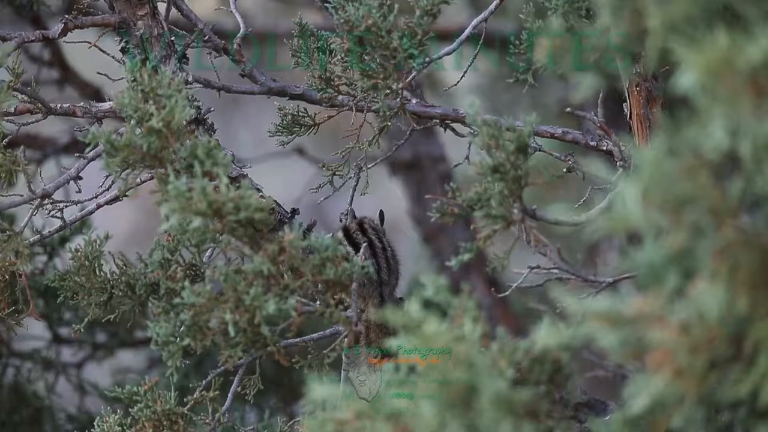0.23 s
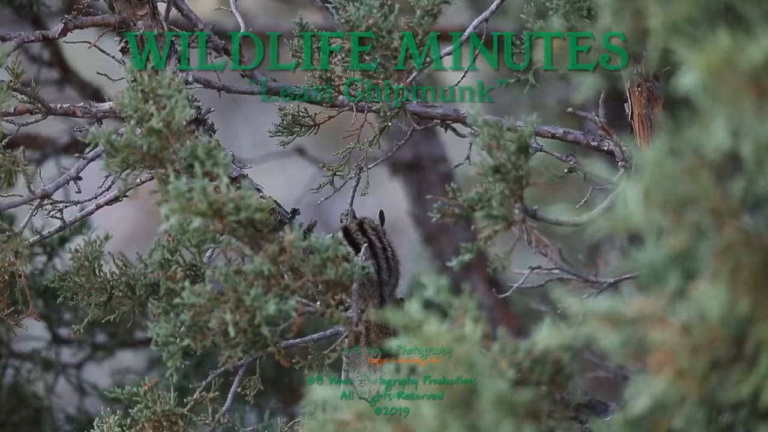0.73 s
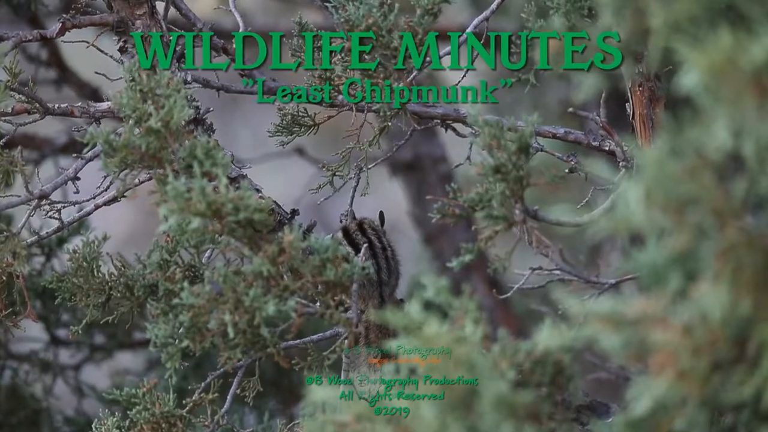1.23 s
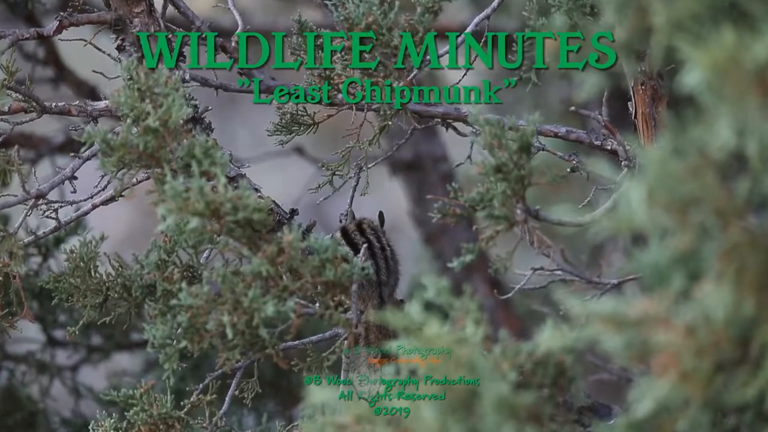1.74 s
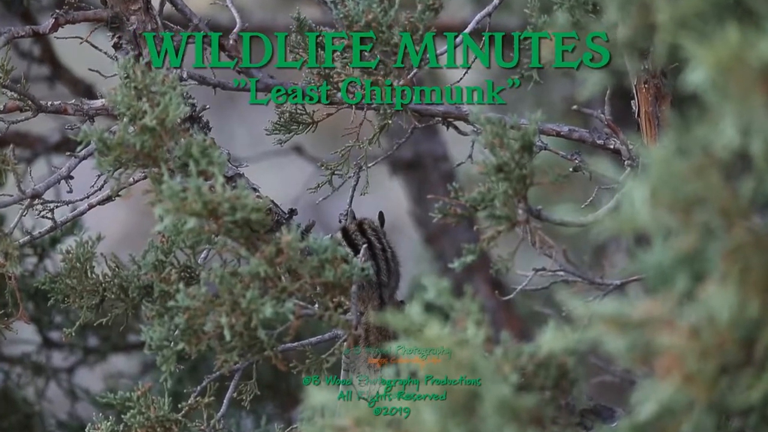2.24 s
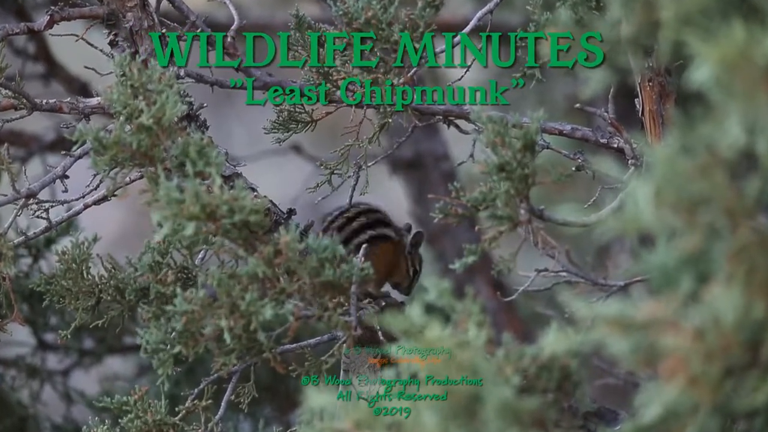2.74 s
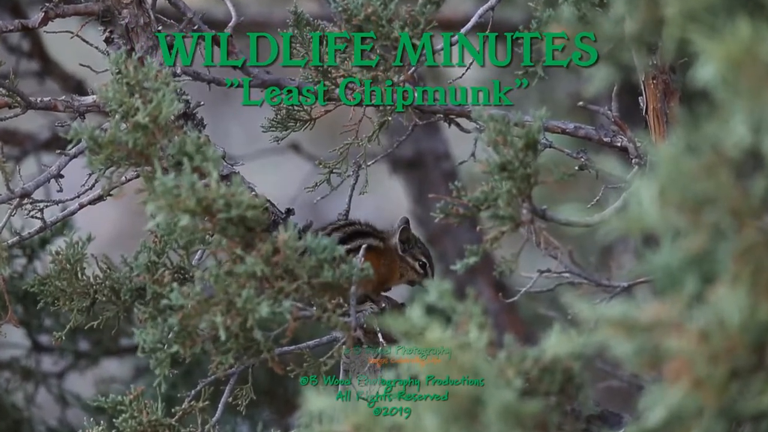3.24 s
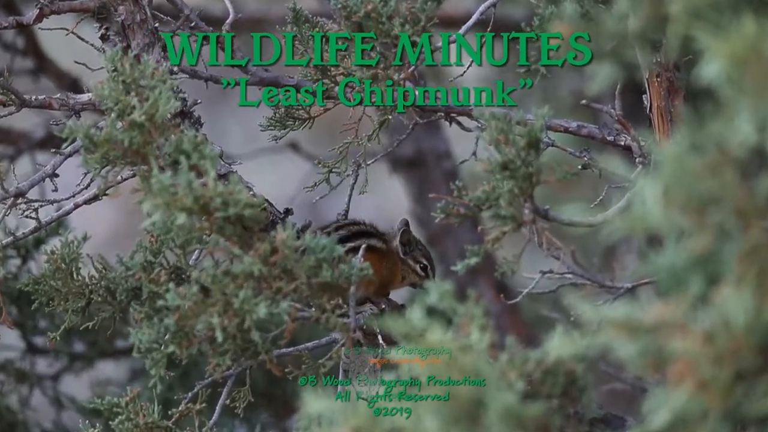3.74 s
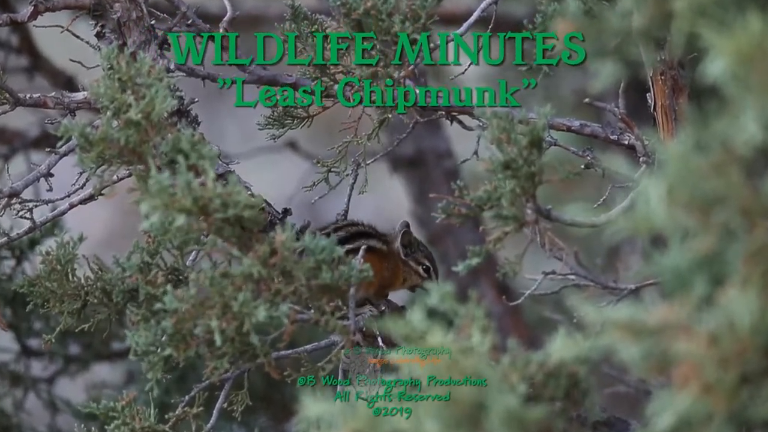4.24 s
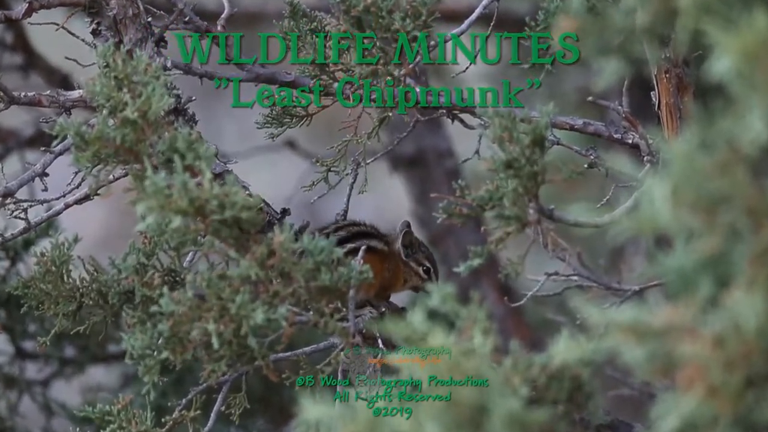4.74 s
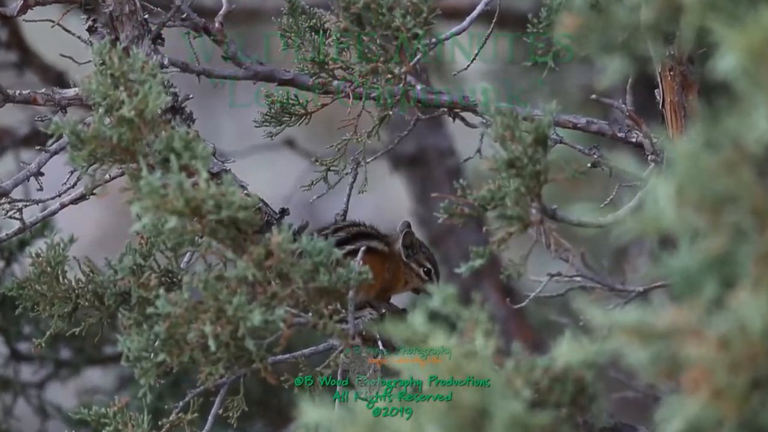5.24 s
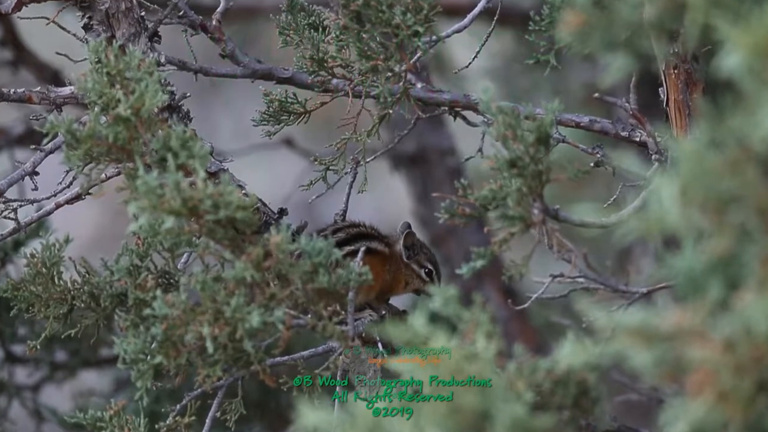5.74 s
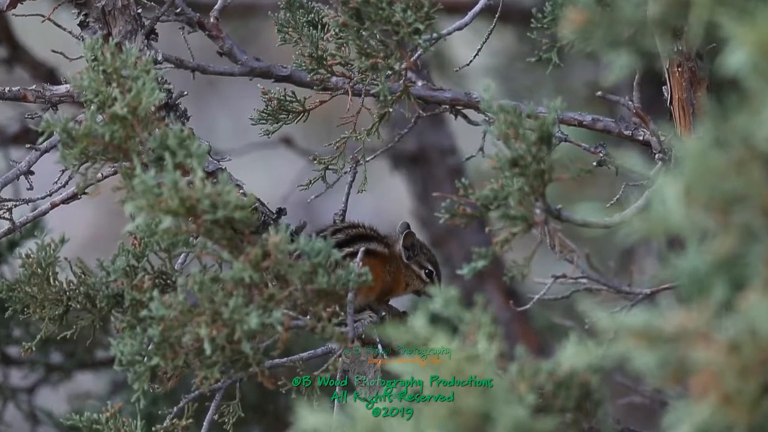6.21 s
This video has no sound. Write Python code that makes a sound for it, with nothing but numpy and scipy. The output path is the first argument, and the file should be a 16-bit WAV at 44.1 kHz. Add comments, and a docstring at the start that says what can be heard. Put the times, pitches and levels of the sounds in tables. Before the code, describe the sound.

Two chipmunks chip rapidly outdoors, their short high calls drifting in and out of step over light wind and a faint distant motor hum.

```python
"""Two chipmunks in a juniper

Each chips about five times a second, and the two drift in and out of step. A chip is a quick run of
upward glides whose pitch leaps into the range where the throat rings; branches and trees scatter it.
Behind them are light wind, a far motor's hum and a few faint bird whistles."""
import sys
import numpy as np
from scipy import signal
from scipy.fft import rfft, irfft, next_fast_len
from scipy.io import wavfile
from scipy.ndimage import map_coordinates

SR = 44100
rng = np.random.default_rng(int(sys.argv[2]) if len(sys.argv) > 2 else 0)


def unload_wav(signal):
    """Save mono or channel-first audio to the path in sys.argv[1] as 16-bit WAV at rate SR, clipped to [-1, 1]."""
    wavfile.write(
        sys.argv[1],
        SR,
        np.round(np.clip(np.atleast_2d(signal).T, -1, 1) * 32767).astype(np.int16),
    )


N = 285327
ATTACK_MS, RELEASE_MS = .5, 1.8  # how quickly each glide of a chip fades in and out


def amp(db):
    """Turn decibels into a number to multiply a sound by."""
    return 10 ** (np.asarray(db) / 20)


def unit(x):
    """Scale a signal to an average strength (rms) of 1."""
    return x / np.sqrt(np.mean(x ** 2) + 1e-20)


def along(points, hz):
    """Read between (Hz, value) points, giving every octave the same width."""
    point_hz, values = np.transpose(points)
    return np.interp(np.log(hz + 1), np.log(point_hz + 1), values)


def wobble(rate, size=N):
    """A smooth curve through `rate` random values a second."""
    position = np.arange(size) * rate / SR
    return map_coordinates(rng.standard_normal(int(position[-1]) + 4), [position])


def swell(s, half_length_s, db):
    """A rise in dB that comes up, holds around time s and sinks again."""
    return db / (1 + ((np.arange(N) / SR - s) / half_length_s) ** 4)


def filtered(x, response):
    """Scale each frequency in x by response(hz)."""
    size = next_fast_len(N + SR // 4)
    hz = np.fft.rfftfreq(size, 1 / SR)
    return irfft(rfft(x, size) * response(hz), size)[..., :N]


def noise(spectrum):
    """Noise of strength 1, shaped by (Hz, dB) points."""
    return unit(filtered(rng.standard_normal(N), lambda hz: amp(along(spectrum, hz))))


def add(track, s, sound):
    """Mix a sound into the track from time s."""
    i = max(round(s * SR), 0)
    track[i:i + len(sound)] += sound[:max(N - i, 0)]


def scatter(fade_s, rise_s):
    """A blur of tiny echoes that builds up, then dies away by 60 dB every fade_s."""
    t = np.arange(SR // 2) / SR
    build_up = 1 - np.exp(-(t / rise_s) ** 2)
    tail = rng.standard_normal(len(t)) * amp(-60 * t / fade_s) * build_up
    return tail / np.linalg.norm(tail)


def woodland(sound, echoes, branches_db, trees_db):
    """A sound arrives directly, as single echoes, and blurred by near branches and farther trees."""
    path = amp(branches_db) * scatter(fade_s=.066, rise_s=.0051)
    path += amp(trees_db) * scatter(fade_s=.42, rise_s=.01)
    path[0] += 1  # the direct sound
    for ms, db in echoes:
        path[round(ms * SR / 1000)] += amp(db)
    return signal.fftconvolve(sound, path)


def wind():
    """Steady air, one soft gust in the needles, and a far rumble and drone that slowly grow."""
    # Four noise shapes. Each row: frequency in Hz, relative level in dB.
    air_shape = [(25, -34), (40, -7), (85, -8.5), (150, -2.5), (200, -1), (400, 0.5), (600, -2),
                 (1100, -3.5), (1500, -7.5), (2000, -12), (4000, -17.5), (7500, -19.5), (11000, -21.5),
                 (15000, -25.5)]
    needle_shape = [(400, -62), (700, -5.5), (1100, 4), (1650, -3.5), (2100, -21.5), (4000, -41)]
    rumble_shape = [(35, -44), (65, -7), (120, 7), (170, -33), (300, -42)]
    drone_shape = [(120, -40), (180, 4), (230, 4), (270, -7), (380, -33)]
    # The gust and two low swells near 3.6 s and 3.9 s. Each gives: middle in seconds, half length in seconds,
    # rise in dB.
    gust = (2.39, .2, 9)
    bumps = [(3.6, .06, 13), (3.92, .1, 9)]
    growth_db = .97 * np.arange(N) / SR
    bumps_db = sum(swell(*bump) for bump in bumps)
    air = amp(-48) * noise(air_shape)
    needles = amp(-59.5 + swell(*gust)) * noise(needle_shape)
    rumble = amp(-70.5 + growth_db + bumps_db) * noise(rumble_shape)
    drone = amp(-65 + growth_db / 2 + 2.5 * wobble(6)) * noise(drone_shape)  # comes and goes
    return air + needles + rumble + drone


def motor(drift=.0018, smear_radians=.61, waver_db=1, treble_db=-1.3):
    """A far motor hums; its higher tones waver more on their way through the air."""
    # The hum's tones. Each row: frequency in Hz, base level in dB.
    tones = [(59.5, -62.5), (119.5, -66.5), (226.1, -65), (297.2, -67), (356.9, -60), (475.9, -66.5)]
    speed = 1 + drift * wobble(1.92)
    out = np.zeros(N)
    for hz, db in tones:
        depth = min((hz / 240) ** 2, 1)
        phase = 2 * np.pi * hz * np.cumsum(speed) / SR + smear_radians * depth * wobble(14)
        level_db = db + depth * (treble_db + waver_db * wobble(5.4))
        out += np.sqrt(2) * amp(level_db) * np.sin(phase)
    return out


def bird(gain_db=3.5, quaver=.014, flutter_db=2.5):
    """A far bird whistles short, slightly unsteady slides through the trees."""
    # Each row: start in seconds, length in seconds, first and last pitch in Hz, base level in dB.
    whistles = [(.11, .068, 5300, 3900, -60), (.228, .045, 4400, 2800, -56), (.28, .032, 3800, 2800, -55),
                (.37, .035, 3950, 2750, -55), (.402, .03, 4100, 3000, -55), (2.475, .035, 3450, 3850, -59),
                (2.82, .028, 4850, 4150, -57), (2.997, .018, 4400, 4130, -54),
                (3.168, .028, 4250, 4080, -55)]
    out = np.zeros(N)
    for s, length_s, start_hz, end_hz, db in whistles:
        n = round(length_s * SR)
        pitch = np.geomspace(start_hz, end_hz, n) * (1 + quaver * wobble(390, n))
        level = amp(db + gain_db + flutter_db * wobble(190, n)) * np.sqrt(np.hanning(n))
        note = level * np.sin(2 * np.pi * np.cumsum(pitch) / SR)
        add(out, s, woodland(note, echoes=[], branches_db=-3, trees_db=-3))
    return out


def tremble(size):
    """A very fast random quiver for the voice."""
    smoothed = signal.fftconvolve(rng.standard_normal(SR // 20), np.hanning(SR // 700), "same")
    return unit(smoothed)[:size]


def glide(row, tuning, roughness, overtone_fall_db, shimmer_db=2.5, overlap_ms=.35):
    """One upward sweep of the voice with its overtones; pitch and strength tremble a little."""
    length_ms, start_hz, end_hz, db, swell_db, overtones_db, growth_db = row
    ms = np.arange(-overlap_ms, length_ms + overlap_ms, 1000 / SR)
    progress = ms / length_ms
    pitch = start_hz * (end_hz / start_hz) ** progress * (tuning + roughness * tremble(len(ms)))
    phase = 2 * np.pi * np.cumsum(pitch) / SR
    voice = np.sin(phase)
    for k in (2, 3, 4):
        overtone_db = overtones_db + growth_db * (progress - .5) - overtone_fall_db * (k - 2) ** 2
        voice += amp(overtone_db) * (k * pitch < SR / 2) * np.sin(k * phase)
    edges = np.minimum((ms - ms[0]) / ATTACK_MS, (ms[-1] - ms) / RELEASE_MS)
    fade = np.sin(np.pi / 2 * np.minimum(edges, 1))
    level_db = db + swell_db * (progress - .5) + shimmer_db * tremble(len(ms))
    return voice * fade * amp(level_db)


def chip(glides, throat, treble_db, pitch_spread, roughness, overtone_fall_db):
    """Four glides, shaped by the throat: faint low start, buzzy lead-in, main note, closing flick."""
    # How much each of the four glides varies from chip to chip, in dB.
    variations_db = [1.4, 0.76, 0.18, 0.3]
    # Where a wider mouth brightens the chip. Each row: frequency in Hz, share of treble_db.
    mouth = [(6500, 0), (8000, 0.98)]
    voice = np.zeros(SR // 20)
    tuning = 1 + pitch_spread * rng.standard_normal()
    s = 0
    for row, variation_db in zip(glides, variations_db):
        strength = amp(variation_db * rng.standard_normal())
        add(voice, s, strength * glide(row, tuning, roughness, overtone_fall_db))
        s += row[0] / 1000
    hz = np.fft.rfftfreq(len(voice), 1 / SR)
    shape_db = along(throat, hz) + treble_db * along(mouth, hz)
    return irfft(rfft(voice) * amp(shape_db), len(voice))


def chipmunk(chips, glides, throat, echoes, gain_db, branches_db, trees_db, **voice):
    """One animal's chips, each timed by its main note and heard through the trees."""
    out = np.zeros(N)
    lead_s = (glides[0][0] + glides[1][0] + ATTACK_MS) / 1000
    for s, db, treble_db in chips:
        call = amp(db + gain_db) * chip(glides, throat, treble_db, **voice)
        add(out, s - lead_s, woodland(call, echoes, branches_db, trees_db))
    return out


def two_chipmunks():
    """One voice is bright; the other is hoarse because its pitch trembles more."""
    # The chips. Each row: time of the main note in seconds, base level in dB, treble boost in dB.
    bright_chips = [(0.2146, -28, -2), (0.4146, -24, -1.5), (0.6102, -25, 1), (0.8183, -25, 0),
                    (1.037, -23.5, 1.5), (1.2549, -25, -1.0), (1.475, -24.5, 2), (1.6771, -24.5, 0.5),
                    (1.8748, -24, 0), (2.1323, -24.5, 2), (2.4485, -25, -4), (2.7105, -24, -3),
                    (2.9477, -25, -5), (3.1294, -24, -2), (3.3215, -24.5, 0), (3.5496, -25.5, 2),
                    (3.7497, -24.5, -2.5), (3.941, -25.5, 2.5), (4.1361, -26, 1.5), (4.3237, -26.5, 0.5),
                    (4.5196, -24, 0), (4.7067, -24.5, 0.0), (4.8893, -25.5, 0), (5.0799, -24, 1.5),
                    (5.2743, -23.5, 1.5), (5.436, -23.5, 1), (5.6342, -23.5, 2), (5.9483, -24, 1.5),
                    (6.1904, -23.5, 0.5), (6.3656, -22.5, 0)]
    hoarse_chips = [(0.1909, -24, -4.5), (0.4418, -27.5, 1), (0.669, -25, -2.5), (0.9233, -26.5, 0.5),
                    (1.0802, -26.5, -1), (1.2883, -27.5, 0), (1.5038, -27.3, 1.5), (1.7417, -26, -2),
                    (1.8928, -25.5, -3), (2.1336, -25.5, -2), (2.4739, -26, -3), (2.7349, -26, -2),
                    (2.9143, -27.5, 3.5), (3.1129, -24.5, -1), (3.3071, -24, -2.0), (3.4837, -28.5, 1),
                    (3.6873, -29, 1.5), (3.8948, -29, 0.0), (4.1176, -30.5, 0.0), (4.3361, -30, 1.0),
                    (4.5224, -29.7, -2), (4.7452, -29.5, 3), (4.95, -27.5, 0.5), (5.167, -28, 2.5),
                    (5.3649, -28, 2), (5.5505, -27.5, 1), (5.7633, -29.5, 5), (6.0635, -29.5, 3.5),
                    (6.3804, -30.5, 0.5)]
    # A chip's glides. Each row: length in ms, first and last pitch in Hz, then in dB the
    # relative level, its change over the glide, the overtones' level and its change over the glide.
    bright_glides = [(9.8, 1570, 2200, -18.5, 3.5, -16, 14), (4.2, 2620, 3700, -10, -7.5, -6, 14),
                     (6.36, 4950, 6160, .5, 2.5, -13, -4), (6.4, 8170, 9500, -7.5, -2, -20, 0)]
    hoarse_glides = [(7.5, 1550, 2260, -14.5, 15, -5, 7), (4.8, 2400, 3000, -7.5, -6.5, 5, 14),
                     (5, 4560, 5040, 0.9, 8.5, -8.5, -6), (3.75, 6060, 6630, 3, 0, -16, 0)]
    # The throats ring most at about 4600-6400 Hz. Each row: frequency in Hz, boost or cut in dB.
    bright_throat = [(1500, -6.5), (2800, -9), (3400, -14.5), (4250, -8), (4700, -5), (5400, 1),
                     (6400, -2.5), (7300, -1), (8400, -12), (10600, -12), (11500, -28), (15000, -45)]
    hoarse_throat = [(1500, -9.5), (2800, -12.5), (4250, -15), (4600, -1.5), (5400, 1), (6400, -1),
                     (7200, -9), (8400, -10.5), (9500, -10), (10200, -25), (15000, -48)]
    # Echoes off branch, ground and trunks. Each row: delay in ms, level against the direct sound in dB.
    bright_echoes = [(2.66, -12), (4.13, -13), (8.91, -11.5), (16.5, -16), (45, -25), (59, -26), (79, -29)]
    hoarse_echoes = [(3.75, -10), (5.86, -11.5), (24, -22)]
    bright = chipmunk(bright_chips, bright_glides, bright_throat, bright_echoes,
                      gain_db=-.5, branches_db=-4, trees_db=-13,
                      pitch_spread=.0026, roughness=.0063, overtone_fall_db=0)
    hoarse = chipmunk(hoarse_chips, hoarse_glides, hoarse_throat, hoarse_echoes,
                      gain_db=-1.5, branches_db=-7.5, trees_db=-15.5,
                      pitch_spread=.0083, roughness=.019, overtone_fall_db=2)
    return bright + hoarse


def scene():
    """All the sources together, the same in both channels."""
    mono = two_chipmunks() + bird() + wind() + motor()
    return np.array([mono, mono])


def record(dry, start_s=.069, fade_s=.004, top_hz=15900):
    """The sound opens after a moment of silence and keeps nothing above top_hz."""
    opening = np.clip((np.arange(N) / SR - start_s) / fade_s, 0, 1)
    return filtered(dry * opening, lambda hz: hz < top_hz)


dry = scene()
out = record(dry)
unload_wav(out)
```